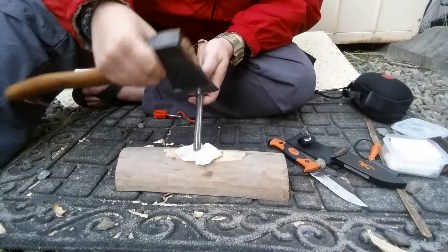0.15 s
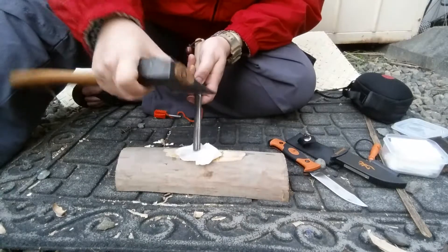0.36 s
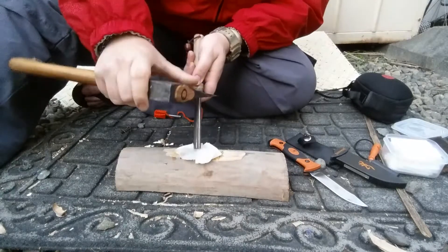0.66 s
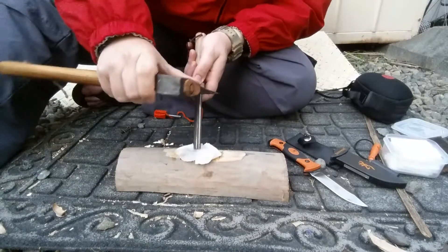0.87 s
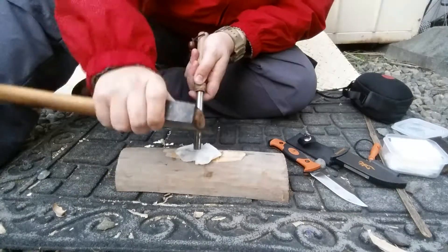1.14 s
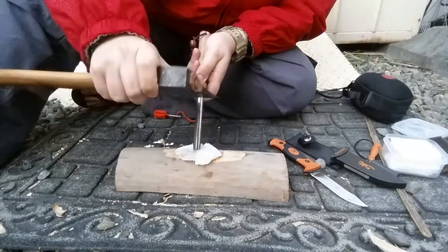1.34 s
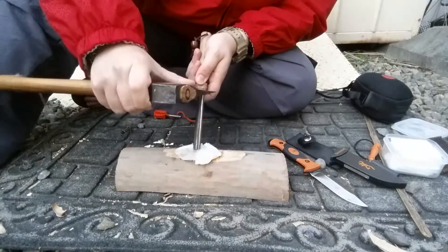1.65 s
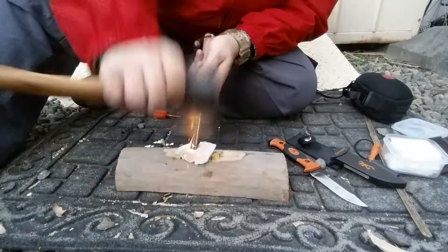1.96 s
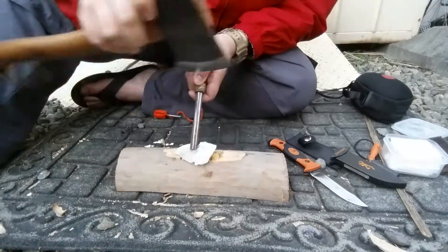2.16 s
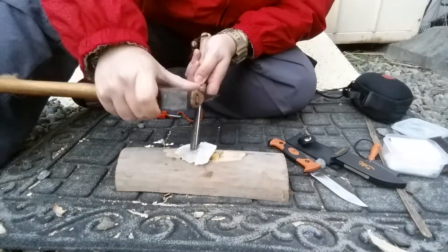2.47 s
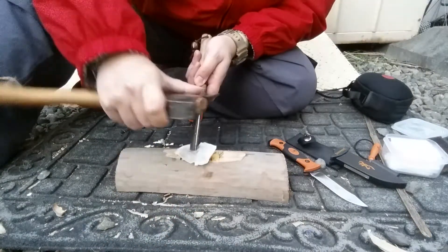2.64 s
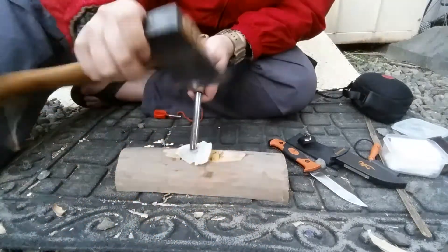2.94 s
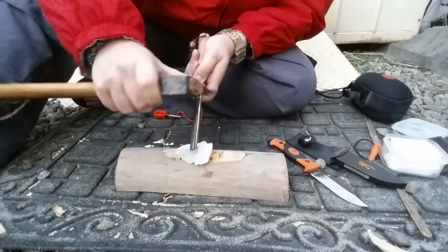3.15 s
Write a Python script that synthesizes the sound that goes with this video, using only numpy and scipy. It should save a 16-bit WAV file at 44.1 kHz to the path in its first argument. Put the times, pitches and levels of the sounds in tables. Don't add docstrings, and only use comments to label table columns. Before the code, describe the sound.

Three quick gritty steel rasps down a fire-starting rod on a log, with bursts of crackling sparks

```python
import sys
import numpy as np
from scipy import signal
from scipy.fft import rfft, irfft
from scipy.io import wavfile
from scipy.ndimage import uniform_filter1d

SR = 44100
rng = np.random.default_rng(int(sys.argv[2]) if len(sys.argv) > 2 else 0)


def wav_record(signal):
    frames = np.transpose(np.atleast_2d(signal))
    bounded = np.clip(frames, -1, 1)
    quanta = np.round(bounded * 32767).astype(np.int16)
    wavfile.write(sys.argv[1], SR, quanta)


def decibels_to_gain(level_db):
    exponent = np.asarray(level_db, float) / 20
    return 10 ** exponent


N = 145530

# (time [s], edge pressure [dB], spark shower [dB], shudder of rod and log [dB])
STROKES = [
    [(1.106, -89, -78, -72), (1.126, -77, -54, -58.5), (1.14, -59.5, -48, -71.5),
     (1.184, -49.5, -41, -51.5), (1.212, -51.5, -38.5, -58), (1.224, -69, -64, -62), (1.24, -96, -72, -66)],
    [(1.879, -80, -78, -64), (1.902, -63.5, -45, -57.5), (1.936, -47, -41.5, -50), (1.954, -49, -28, -37.5),
     (1.97, -56.5, -37, -58.5), (1.984, -69, -42.5, -62), (2.01, -51, -38, -54), (2.04, -93, -72.5, -65)],
    [(2.717, -77, -72, -63), (2.733, -64, -53, -54.5), (2.756, -46.5, -37, -57),
     (2.78, -51.5, -37.5, -46.5), (2.794, -54, -37, -54.5), (2.82, -57, -39.5, -53.5),
     (2.865, -85, -67, -76.5)],
]
# (start [s], length [s], level [dB], ringing [dB], treble modes [dB])
SLIDES = [
    (0.0, 0.053, -86, 3, -9),
    (0.108, 0.0045, -87.5, 3, -14),
    (.779, .003, -72.5, -10.5, -18),
    (1.62, 0.019, -76, -0.5, -7),
    (1.662, 0.018, -74.5, -2, -0.5),
    (1.689, 0.019, -68.5, -12, -3),
    (2.505, 0.058, -76.5, -5, -7),
    (2.599, 0.015, -69, -9, -4),
    (3.268, 0.0035, -78, 2, -4),
]
# (time [s], peak [dB])
CATCHES = [(1.119, -51.5), (1.1263, -47), (1.1402, -42), (1.1549, -34), (1.17, -43), (1.18, -41),
           (1.2066, -23), (1.8904, -50), (1.9062, -33), (1.921, -35), (1.9373, -39), (1.9498, -23),
           (2.721, -59), (2.733, -34), (2.755, -31), (2.7768, -25.5)]
HEAD_HZ = [2260, 2785, 2850, 3750, 5170, 6590, 7900, 9570, 10700, 11700, 13950, 15650]
TAPPED_HZ = [950, 1420, 2250, 3030, 4200, 5300, 6800, 8060]
# (level [dB], t60 [s])
TAPPED = [(1.5, 0.0048), (-0.5, 0.011), (-3, 0.019), (2.5, 0.036), (-18, 0.024), (-27.5, 0.044),
          (-26.5, 0.078), (-32.5, 0.063)]
GRIT_PER_S, GRIT_SPREAD_DB = 7000, 4
SLIDE_EDGE_S = 0.0088


def rms_one(x):
    return x / np.sqrt(np.mean(x ** 2) + 1e-20)


def curve(s, db, outside_db=-140):
    return decibels_to_gain(np.interp(np.arange(N) / SR, s, db, outside_db, outside_db))


def plateau(rows, edge_s):
    gain = np.zeros(N)
    for s, length, db in rows:
        corners_s = [s, s + edge_s, s + edge_s + length, s + length + 2 * edge_s]
        gain += curve(corners_s, [db - 14.5, db, db, db - 10.5])
    return gain


def at_hz(points, hz):
    points_hz, values = np.transpose(points)
    return np.interp(np.log(hz), np.log(points_hz), values)


def drift(rate_hz):
    r = np.exp(-80 * np.pi * rate_hz / SR)
    slow = signal.lfilter([1], [1, -2 * r, r * r], rng.standard_normal(N // 40 + 2002))[2000:]
    return np.interp(np.arange(N) / 40, np.arange(len(slow)), rms_one(slow))


def ring(x, hz, t60_s):
    r, w = decibels_to_gain(-60 / (t60_s * SR)), 2 * np.pi * hz / SR
    return signal.lfilter([0, np.sin(w)], [1, -2 * r * np.cos(w), r * r], x + 1e-18)


def colour(x, spectrum):
    gain = decibels_to_gain(at_hz(spectrum, np.arange(1, N // 2 + 2) * SR / N))
    return irfft(rfft(x) * gain / np.sqrt(np.mean(gain ** 2)), N)


def grains(per_s, spread_db):
    size = decibels_to_gain(spread_db * np.minimum(rng.exponential(1, N), 5)) * rng.choice([-1, 1], N)
    return rms_one(size * (rng.random(N) < per_s / SR))


def body(force, pitches_hz, modes, per_s, wander_db, tilt_db=0, catches=0, grip_db=None):
    push = force * grains(per_s, GRIT_SPREAD_DB) + catches
    if grip_db is None:
        grip_db = np.zeros(len(modes))
    rings = np.zeros(N)
    for hz, (db, t60_s), favour_db in zip(pitches_hz, modes, grip_db):
        octaves = min(np.log2(hz / 6000), 0)
        share = decibels_to_gain(favour_db + wander_db * drift(35.5) + tilt_db * octaves)
        rings += decibels_to_gain(db) * ring(push * share, hz, t60_s) / np.sqrt(t60_s * SR / 28)
    return signal.lfilter(*signal.butter(2, 130, "high", fs=SR), rings)


def stroke_gain(column):
    gain = np.zeros(N)
    for rows in STROKES:
        points = np.array(rows)
        gain += curve(points[:, 0], points[:, column])
    return uniform_filter1d(gain, size=SR // 300)


def travel():
    t = np.arange(N) / SR
    return sum(np.interp(t, [rows[0][0], rows[-1][0]], [-.5, .5], 0, 0) for rows in STROKES)


def grip():
    favour_db = [
        (2.6, 0, 0, -2.6, 0.5, -1.9, -2.5, -0.29, 0, -3, 0.86, 1),
        (0, 0, 0.0053, 0.86, 4, -1.3, -1, -1.9, 4, 2.5, 0.13, -2),
        (0, 0, 0, 0, -11, 0.57, 11, -2, -5, 3, 0, -3),
    ]
    which = np.searchsorted([rows[-1][0] for rows in STROKES[:-1]], np.arange(N) / SR)
    return np.transpose(favour_db)[:, which]


def ridge_clicks():
    clicks = np.zeros(N)
    for s, db in CATCHES:
        clicks[int(s * SR)] = decibels_to_gain(db)
    return clicks


def slide_gain():
    return plateau([row[:3] for row in SLIDES], SLIDE_EDGE_S)


def steel_head():
    # (level [dB], t60 [s])
    head = [(-12.5, 0.035), (-2.5, 0.048), (-5.5, 0.056), (-12.5, 0.0033), (-16, 0.028), (2, 0.037),
            (-6.5, 0.067), (-12, 0.02), (-15, .035), (-11.5, 0.037), (-4.5, 0.021), (0, 0.032)]
    brighten_db_per_octave = 20
    steel = body(stroke_gain(column=1), HEAD_HZ, head, GRIT_PER_S, wander_db=3.0,
                 tilt_db=brighten_db_per_octave * travel(), catches=decibels_to_gain(3.5) * ridge_clicks(), grip_db=grip())
    return decibels_to_gain(-2) * steel


def raw_grit():
    # (frequency [Hz], density [dB per Hz])
    grind = [(700, -40), (1300, -2.5), (2760, 5.5), (4200, -8.5), (6000, -8), (16000, -32)]
    force = stroke_gain(column=1) + slide_gain()
    grit = decibels_to_gain(-4) * force * colour(grains(GRIT_PER_S, GRIT_SPREAD_DB), grind)
    return grit + decibels_to_gain(-7) * colour(ridge_clicks(), grind)


def log_shudder():
    # (pitch [Hz], level [dB], t60 [s])
    log_modes = [(190, 8, 0.013), (340, 5.5, 0.024), (490, 2, 0.022), (806, 3, 0.012), (970, -3.5, 0.0145),
                 (1380, -6, 0.038), (1710, -4.5, 0.029)]
    force = stroke_gain(column=3) + decibels_to_gain(3.5) * slide_gain()
    wood = body(force, [m[0] for m in log_modes], [m[1:] for m in log_modes], 4000, wander_db=4.24,
                catches=decibels_to_gain(-4.5) * ridge_clicks())
    return decibels_to_gain(-2.84) * wood


def light_slides():
    # (level [dB], t60 [s])
    grazed = [(-28, 0.036), (8.5, 0.035), (-6, 0.033), (-4.5, 0.011), (-23, 0.013), (-6, 0.03), (-15, 0.03),
              (-21, 0.015), (-13, .015), (-13, .015), (-4, 0.021), (-10, 0.02)]
    ringing = plateau([(s, length, db + ring_db) for s, length, db, ring_db, _ in SLIDES], SLIDE_EDGE_S)
    treble = plateau([(s, length, db + treble_db) for s, length, db, _, treble_db in SLIDES], SLIDE_EDGE_S)
    low = body(ringing, HEAD_HZ[:7], grazed[:7], GRIT_PER_S, wander_db=4.5)
    return low + body(treble, HEAD_HZ[7:], grazed[7:], GRIT_PER_S, wander_db=6.0)


def settling():
    # (start [s], length [s], level [dB])
    settles = [
        (1.503, 0.052, -81.5),
        (3.178, 0.04, -65),
        (3.205, 0.0094, -71),
        (3.225, 0.028, -84),
    ]
    return body(plateau(settles, .008), TAPPED_HZ[2:], TAPPED[2:], GRIT_PER_S * 2, wander_db=2.5)


def ignition():
    ignites_db = [
        -9,
        -1,
        0,
    ]
    cold_db, up_to_speed = -8, -.15
    free = sum(curve([rows[0][0], rows[-1][0]], [db, db]) for rows, db in zip(STROKES, ignites_db))
    return free * decibels_to_gain(np.interp(travel(), [up_to_speed - .1, up_to_speed + .1], [cold_db, 0]))


def crackling_sparks():
    # (time [s], peak [dB], t60 [s])
    spark_pops = [(1.9695, -18, 0.011), (1.9735, -32, 0.0073), (1.99, -21.5, .01), (1.996, -21.5, 0.013),
                  (2.0027, -18, 0.03), (2.0116, -17, 0.0086), (2.014, -22, .006), (2.023, -25, .008),
                  (2.7859, -31, .01), (2.7891, -8.5, .008), (2.7936, -18.5, 0.022), (2.8159, -18, 0.038),
                  (2.8291, -27, .008), (2.836, -25, 0.018), (2.9976, -41.5, .01)]
    # (frequency [Hz], density [dB per Hz])
    spark_colour = [(880, -31), (1500, -8), (2370, -9), (4300, -6.5), (8320, -3), (11500, 7.5),
                    (15100, 7.5), (16000, -6)]
    t = np.arange(SR // 20) / SR
    pops = np.zeros(N)
    for s, db, t60_s in spark_pops:
        pops[int(s * SR):][:len(t)] += decibels_to_gain(db - 13 - 60 * t / t60_s)
    pops = pops * rng.standard_normal(N)
    flicker = decibels_to_gain(1.5 * drift(124.3))
    shower = decibels_to_gain(-4.5) * ignition() * stroke_gain(column=2) * flicker
    return colour(shower * grains(14000, spread_db=2.5) + pops, spark_colour)


def smoulder():
    # (frequency [Hz], density [dB per Hz])
    smoulder_colour = [(880, -12), (1500, -0.5), (7170, -14), (14100, -2.5), (16000, -8.5)]
    t60_s = 0.56
    r = decibels_to_gain(-120 / (t60_s * SR))
    glow = np.sqrt(np.abs(signal.lfilter([.0012], [1, -r], stroke_gain(column=2) ** 2)))
    return decibels_to_gain(-19.5) * glow * colour(rng.standard_normal((2, N)), smoulder_colour)


def taps():
    # (time [s], peak [dB], share of ringing [1], brightness [Hz])
    tap_events = [(0.0578, -51, 0.72, 2300), (0.1162, -51.5, 1, 2900), (0.7845, -53, 0.3, 2700),
                  (.7945, -55.5, 0.21, 3930), (1.2075, -38, 0.44, 2980), (1.4976, -37, 0.7, 3360),
                  (1.7122, -39.5, 0.31, 2570), (1.9808, -17, 0.16, 2600), (2.4611, -40, 0.17, 2960),
                  (2.6188, -41.5, 0.55, 2630), (3.1699, -24.5, 0.51, 7000), (3.281, -47, .3, 2400)]
    firm_db, light_pitch = -44, .93
    out, t = np.zeros(N + SR), np.arange(SR // 4) / SR
    thump_band = signal.butter(2, [90, 900], "band", fs=SR)
    for s, db, ringing, bright_hz in tap_events:
        pitch = 1 if db > firm_db else light_pitch
        crack = 0.72 * rng.standard_normal(len(t)) * decibels_to_gain(-60 * t / 0.0091)
        thump = 0.95 * signal.lfilter(*thump_band, rng.standard_normal(len(t)) * decibels_to_gain(-60 * t / 0.039))
        modes = np.zeros(len(t))
        for hz, (mode_db, t60_s) in zip(TAPPED_HZ, TAPPED):
            vary_db = rng.normal(0, 1.5)
            modes += decibels_to_gain(mode_db + vary_db - 60 * t / t60_s) * np.sin(2 * np.pi * hz * pitch * t)
        soft = signal.butter(3, min(bright_hz, 20000), fs=SR)
        tap = signal.lfilter(*soft, crack + ringing * modes) + 0.42 * ringing * modes + thump
        out[int(s * SR):][:len(t)] += decibels_to_gain(db - 1.75) * tap
    return out[:N]


def knocks():
    # (time [s], peak [dB], pitch [Hz], t60 [s])
    knock_events = [(1.1975, -24, 206, 0.081), (1.2025, -29, 200, 0.025), (1.944, -23.5, 1000, 0.02),
                    (1.955, -26.5, 236, 0.052), (1.9825, -9.5, 340, 0.019), (1.9825, -18, 490, 0.033),
                    (1.986, -25, 136, 0.078), (2.729, -34, 862, 0.043), (2.779, -24.5, 986, 0.014),
                    (3.17, -28.5, 1050, 0.011), (3.17, -25.5, 1370, 0.0074), (3.171, -33.5, 2250, 0.033),
                    (3.171, -43, 5380, 0.019), (3.172, -41, 9400, 0.013), (.117, -67.5, 1436, 0.16),
                    (1.982, -39, 3770, 0.031), (1.984, -40, 1783, 0.028), (3.18, -23.5, 186, 0.045)]
    out, t = np.zeros(N + SR), np.arange(SR // 4) / SR
    for s, db, hz, t60_s in knock_events:
        onset = 1 - np.exp(-t * hz * 2.9)
        out[int(s * SR):][:len(t)] += decibels_to_gain(db - 60 * t / t60_s) * np.sin(2 * np.pi * hz * t) * onset
    return out[:N]


def outdoors(x):
    # (delay left [s], delay right [s], level [dB])
    echoes = [
        (.0047, 0.0075, -22),
        (0.012, 0.015, -26),
    ]
    width_db, width_hz, width_t60_s = -3.5, 1350, 0.0071
    at, dull = np.arange(N), signal.lfilter([.6], [1, -.4], x)
    t = np.arange(SR // 50) / SR
    scatter = rng.standard_normal((2, len(t))) * decibels_to_gain(-60 * t / width_t60_s)
    first, second = [np.convolve(x, k / np.sqrt(np.sum(k ** 2)))[:N] for k in scatter]
    turn = 3.03 * drift(14.3)
    side = np.cos(turn) * first + np.sin(turn) * second
    side = signal.lfilter(*signal.butter(2, width_hz, "high", fs=SR), side)
    out = x + decibels_to_gain(width_db) * side * [[1], [-1]]
    for left_s, right_s, db in echoes:
        out += decibels_to_gain(db) * np.array([np.interp(at - d * SR, at, dull) for d in (left_s, right_s)])
    return out


def stereo_noise():
    # (frequency [Hz], likeness [1])
    likeness = [(60, 1), (240, 0.86), (950, 0.0), (3770, 0), (15000, 0.11)]
    alike = np.clip(at_hz(likeness, np.arange(1, N // 2 + 2) * SR / N), 0, 1)
    mid, side = rfft(rng.standard_normal((2, N)))
    return irfft(np.sqrt(.5 + alike / 2) * mid + np.sqrt(.5 - alike / 2) * side * [[1], [-1]], N)


def sleeve_rustle():
    # (start [s], length [s], level [dB])
    rustles = [
        (.3, 0.11, -82.5),
        (.66, 0.25, -78.5),
        (2.22, 0.15, -80),
        (2.86, 0.35, -76),
    ]
    # (frequency [Hz], density [dB per Hz])
    rustle_colour = [(7000, -35), (8600, -27), (9400, 1.5), (12300, 3.5), (16000, 1.5)]
    return plateau(rustles, .07) * decibels_to_gain(1.2 * drift(15)) * colour(stereo_noise(), rustle_colour)


def distant_rumble():
    # (time [s], level [dB])
    swell = [
        (0.0, -57),
        (3.12, -46.5),
        (3.3, -48),
    ]
    # (frequency [Hz], density [dB per Hz])
    rumble_colour = [(13, -46), (22, -7), (69, -8), (114, 2), (156, -5.5), (222, -9.5), (256, -10),
                     (441, -21), (900, -33), (1170, -78), (1980, -120)]
    return curve(*np.transpose(swell)) * decibels_to_gain(1 + 1.5 * drift(0.78)) * colour(stereo_noise(), rumble_colour)


def traffic_wash():
    # (time [s], level [dB])
    wash = [
        (0.0, -71.5),
        (0.43, -78),
        (3.3, -63.5),
    ]
    # (frequency [Hz], density [dB per Hz])
    wash_colour = [(290, -39), (500, -6.5), (1000, -5.5), (1290, -13), (2700, -21), (3600, -28.5),
                   (6000, -34), (8500, -45)]
    return curve(*np.transpose(wash)) * decibels_to_gain(1.5 + 1.3 * drift(8)) * colour(stereo_noise(), wash_colour)


def hiss():
    # (frequency [Hz], density [dB per Hz])
    hiss_colour = [(2060, -20), (3500, -3), (6010, -18), (11200, -6), (13000, 2), (16000, 0.5)]
    return decibels_to_gain(-81.5) * colour(stereo_noise(), hiss_colour)


def scene():
    scrape = steel_head() + raw_grit() + log_shudder() + light_slides() + settling()
    near = outdoors(scrape + crackling_sparks() + taps() + knocks())
    background = sleeve_rustle() + distant_rumble() + traffic_wash() + hiss()
    left_db = -0.68
    return (near + smoulder() + background) * decibels_to_gain(np.array([[left_db], [-left_db]]))


def band_limit(x):
    return signal.sosfilt(signal.butter(12, 16480, fs=SR, output="sos"), x)


def record(dry):
    cut = signal.sosfilt(signal.cheby2(14, 60, 16200, fs=SR, output="sos"), dry)
    return band_limit(cut - .0004)


dry = scene()
out = record(dry)
wav_record(out)
```